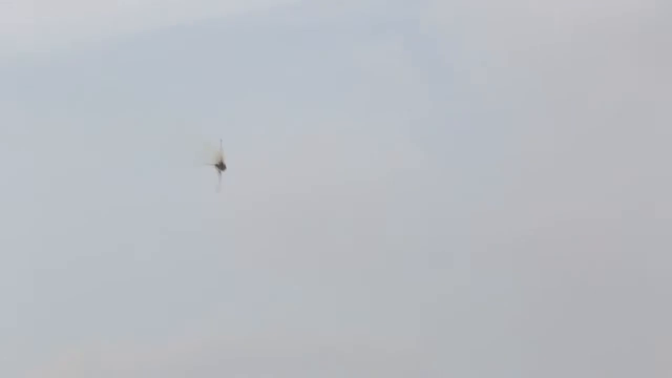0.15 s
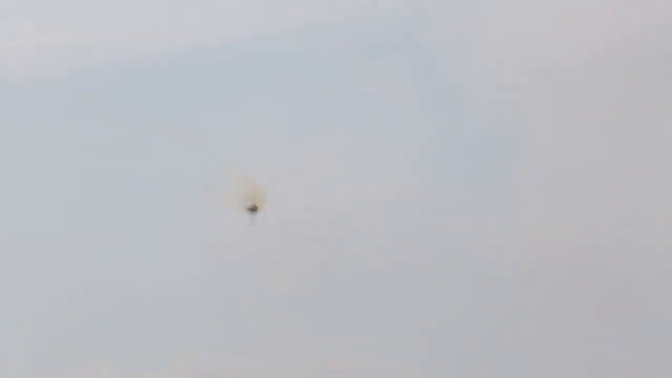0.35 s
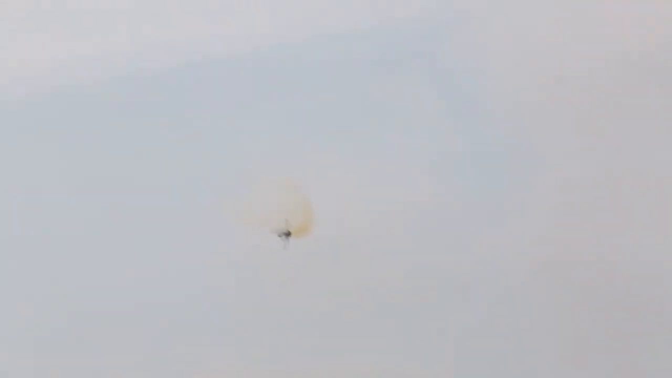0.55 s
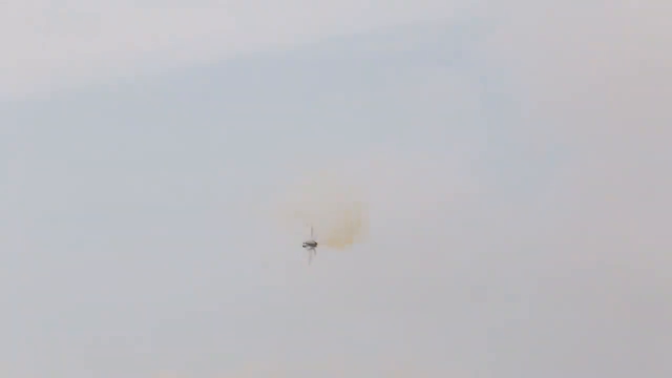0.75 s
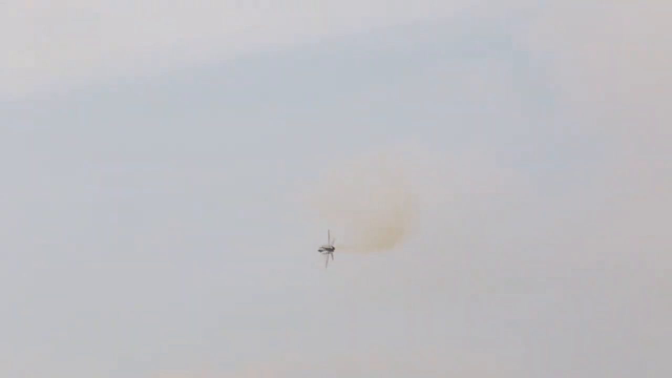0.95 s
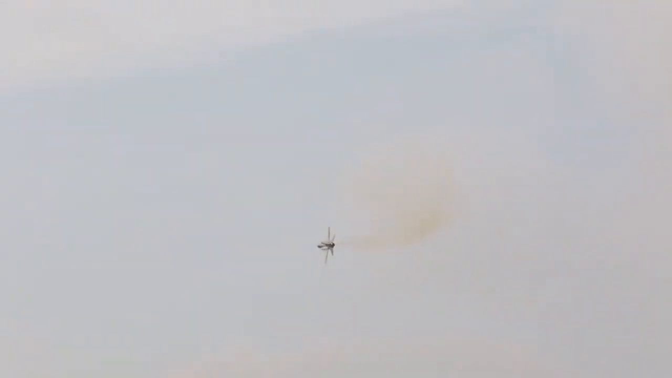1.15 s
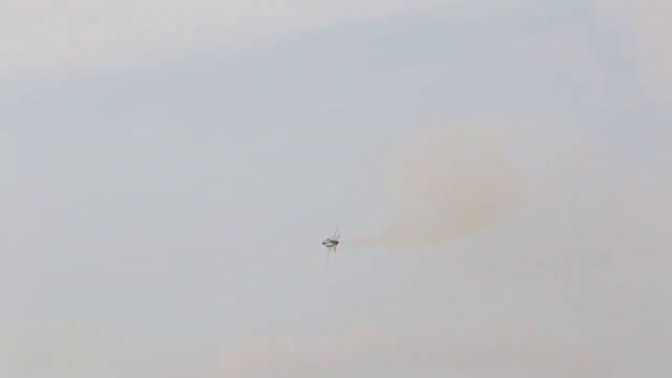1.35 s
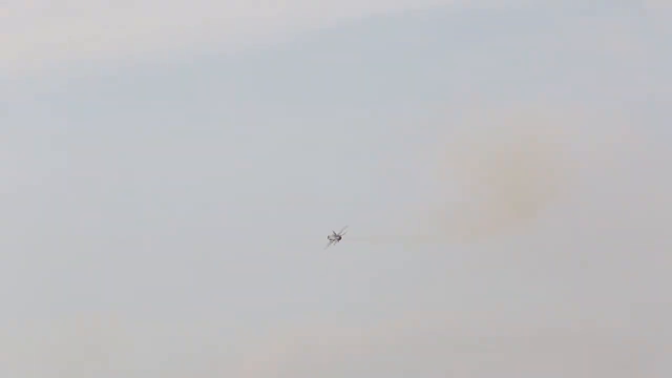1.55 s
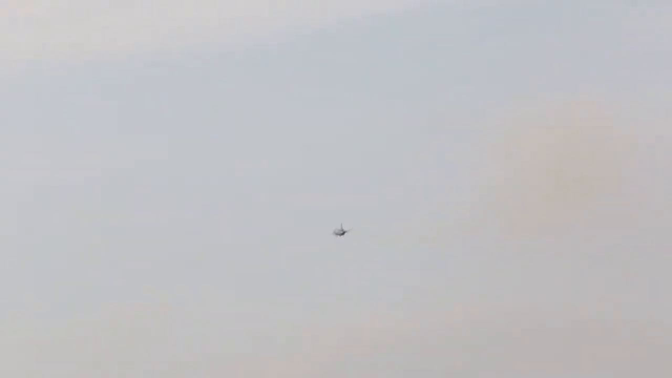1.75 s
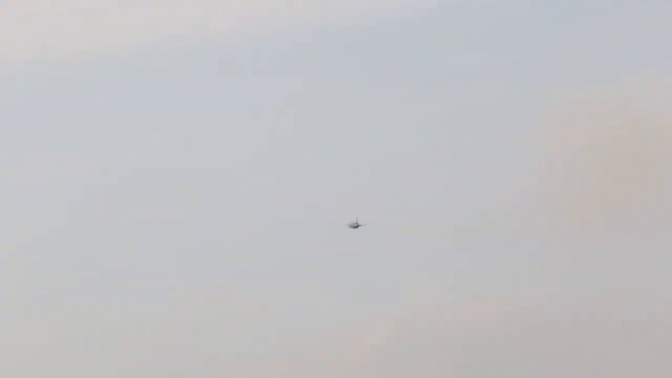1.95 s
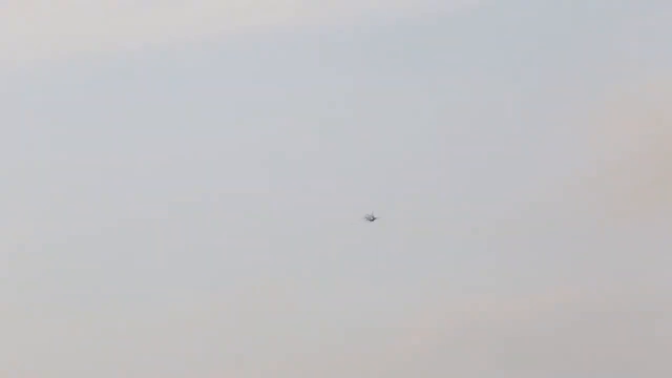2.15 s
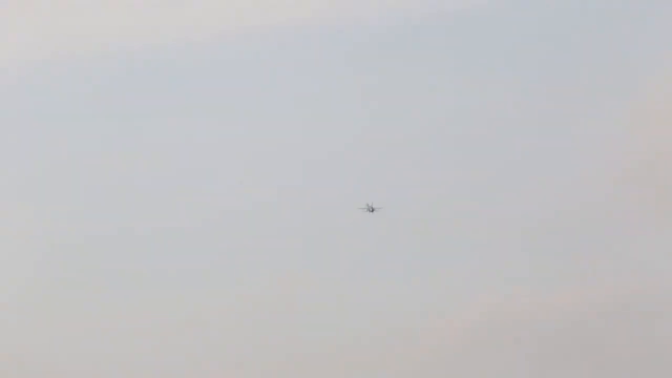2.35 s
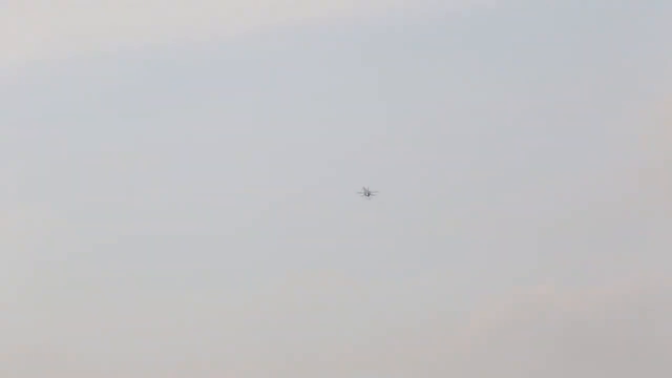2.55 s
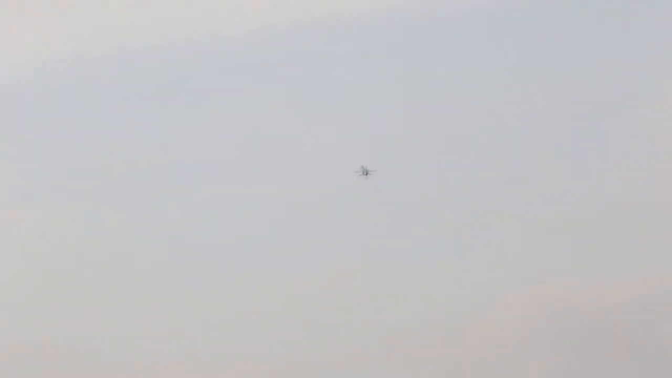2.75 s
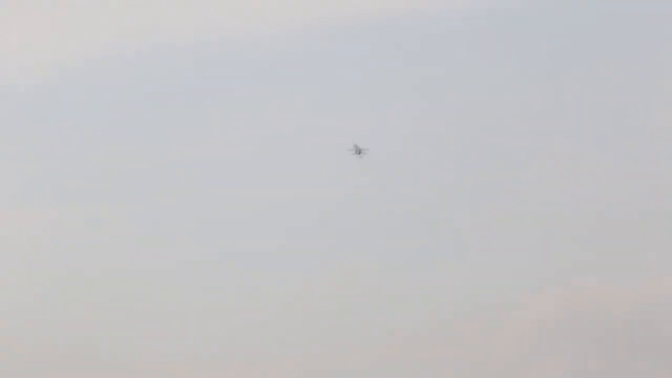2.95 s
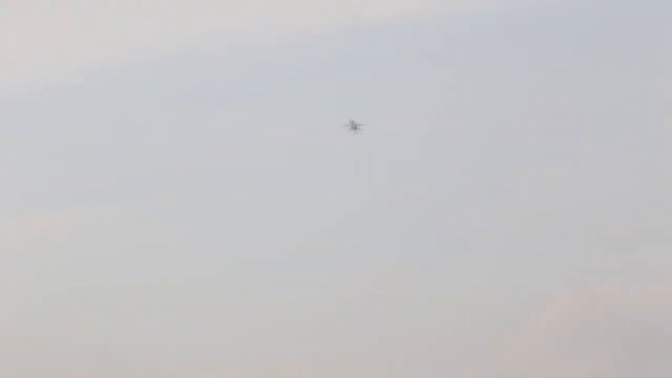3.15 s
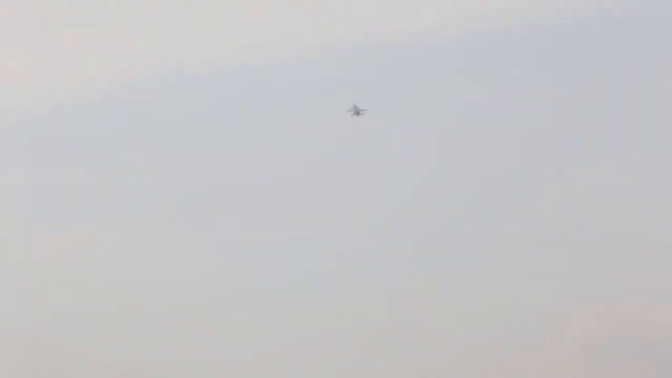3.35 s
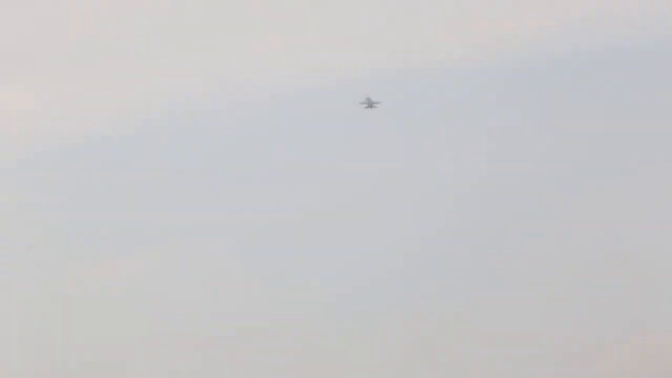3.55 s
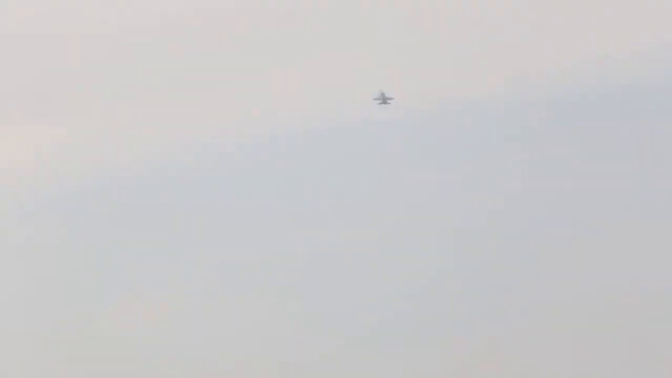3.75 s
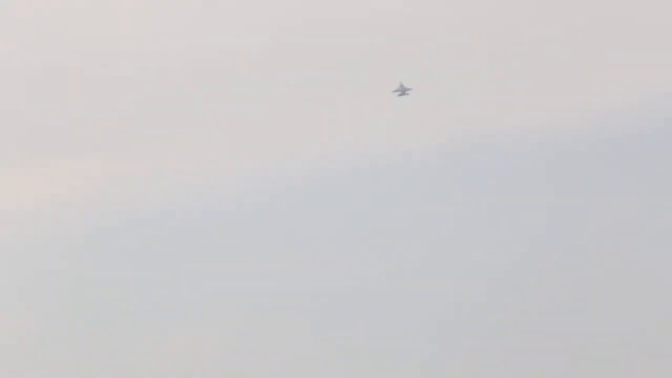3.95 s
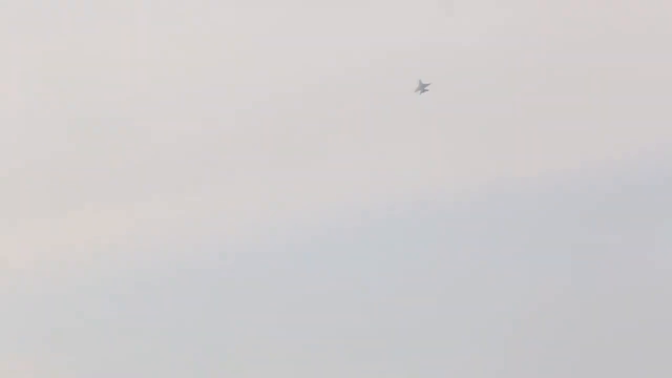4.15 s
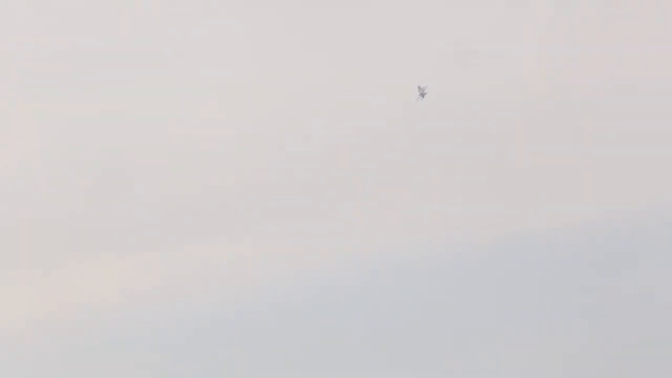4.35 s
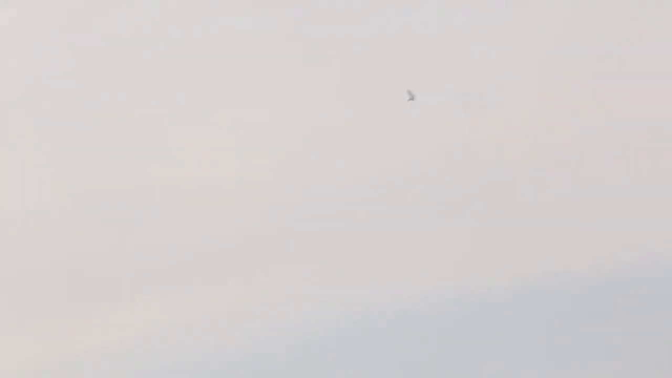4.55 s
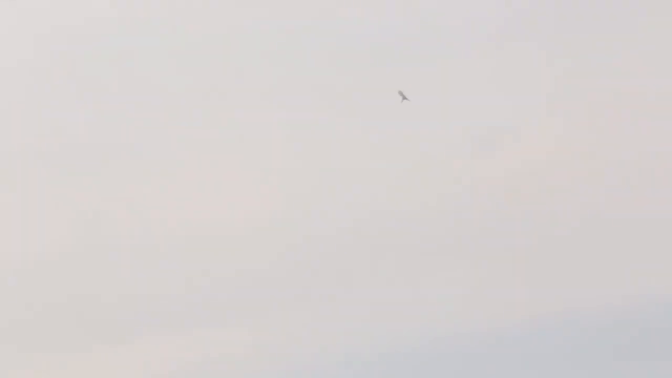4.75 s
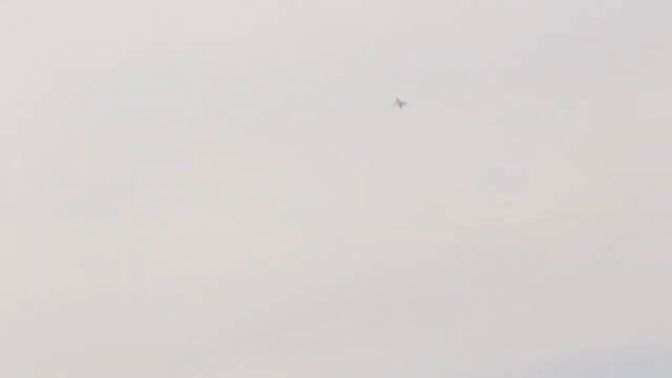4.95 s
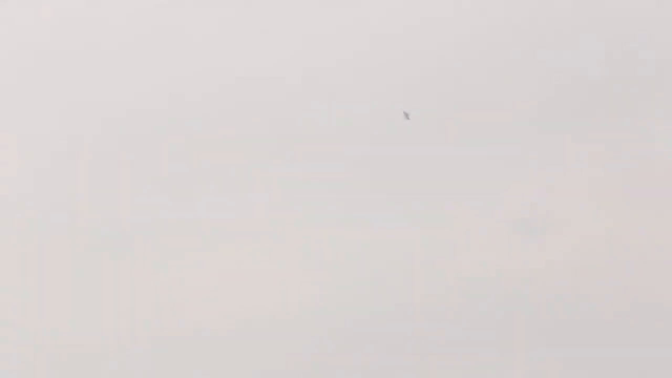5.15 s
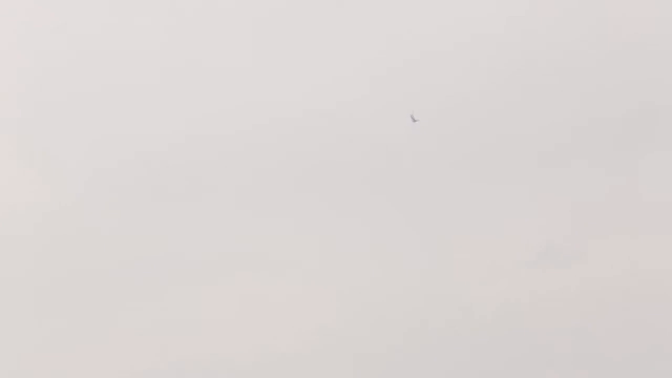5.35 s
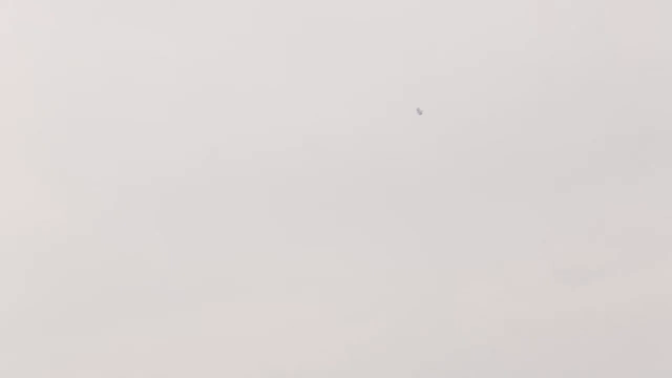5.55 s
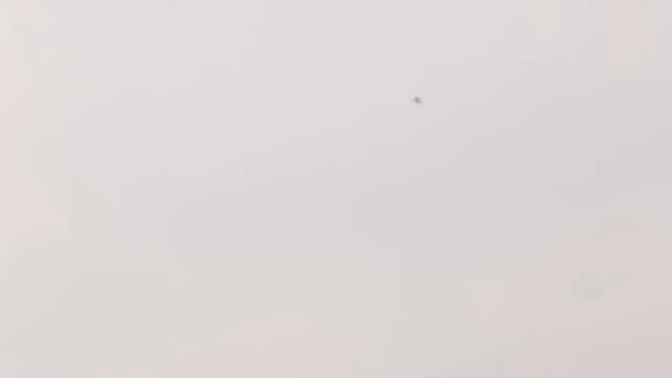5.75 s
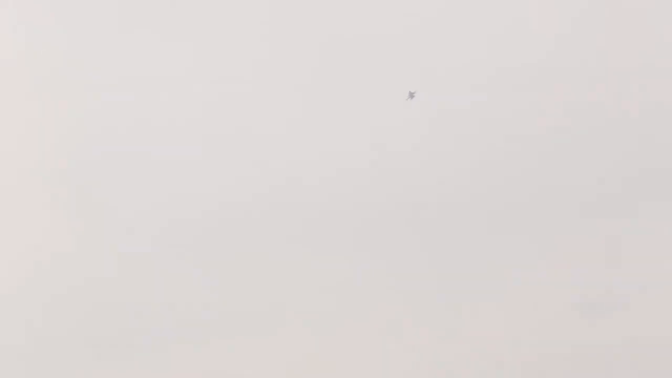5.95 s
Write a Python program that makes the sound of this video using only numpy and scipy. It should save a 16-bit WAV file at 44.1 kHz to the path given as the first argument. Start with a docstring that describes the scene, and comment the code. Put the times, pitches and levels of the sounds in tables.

```python
"""A harsh crackle overloads the microphone: a fighter jet has just passed low overhead and climbs away.
Its exhaust sends out a stream of small shocks (sudden jumps in air pressure), sharp when near and
rounded into a roar when far, while big swirls in the hot gas add a deep rumble. Around four seconds in,
the exhaust swings back towards the listener and the sound grows again. An echo off the ground cancels
some pitches and boosts others, giving the noise a sweeping tone."""
import sys
import numpy as np
from scipy import signal
from scipy.fft import rfft, irfft, next_fast_len
from scipy.io import wavfile
from scipy.ndimage import map_coordinates

SR = 44100
rng = np.random.default_rng(int(sys.argv[2]) if len(sys.argv) > 2 else 0)


def dump(signal):
    """Clip the signal to [-1, 1] and save it as 16-bit WAV at the path in sys.argv[1]."""
    limited = np.clip(np.atleast_2d(signal).T, -1, 1)
    pcm = np.round(limited * 32767).astype(np.int16)
    wavfile.write(sys.argv[1], SR, pcm)


N = 264600  # 6 seconds
TIME_S = np.arange(N) / SR


def from_db(db):
    """Turn decibels into a number to multiply by."""
    return 10 ** (np.asarray(db) / 20)


def values_at(rows, positions):
    """Look up positions in a table's first column and blend the nearest rows."""
    first, *columns = np.transpose(rows)
    return [np.interp(positions, first, column) for column in columns]


def shape_tone(sound, tone):
    """Filter by (pitch_hz, level_db) rows; white noise keeps its overall power."""
    size = 2 * next_fast_len(N)
    pitch_hz, level_db = np.transpose(tone)
    hz = np.maximum(np.arange(size // 2 + 1) * SR / size, 1)
    gain = from_db(np.interp(np.log(hz), np.log(pitch_hz), level_db)) * hz / np.hypot(hz, 20)
    gain /= np.sqrt(np.mean(gain ** 2))
    # minimum phase: the filter rings after a click, never before it
    cepstrum = irfft(np.log(gain))
    cepstrum[1:size // 2] *= 2
    cepstrum[size // 2 + 1:] = 0
    return irfft(rfft(sound, size) * np.exp(rfft(cepstrum)), size)[:N]


def noise(tone):
    """Steady noise with the given tone."""
    return shape_tone(rng.standard_normal(N), tone)


def swells(rows):
    """A loudness curve that rises and falls in one smooth bump per row."""
    return sum(from_db(level_db) * np.exp(-((TIME_S - peak_s) / half_length_s) ** 2)
               for peak_s, level_db, half_length_s in rows)


# Each swish: peak_s, level_db, half_length_s
SWISH_SWELLS = [(2.189, -80, 0.0094), (2.216, -70, 0.0047), (4.958, -81, 0.027), (4.972, -74, 0.0075)]
# Their tone: pitch_hz, level_db
SWISH_TONE = [(1000, -30), (3500, -6), (6500, 2), (9000, -13), (13000, -22)]

def swishes():
    """Faint, high puffs of noise near the microphone."""
    return swells(SWISH_SWELLS) * noise(SWISH_TONE)


# Each rush: peak_s, level_db, half_length_s
RUSH_SWELLS = [(1.02, -28, .04), (5.32, -36.5, 0.11), (5.88, -49.5, .12)]
# Their tone: pitch_hz, level_db
RUSH_TONE = [(400, -33), (750, -9), (1000, 0.5), (1350, 1.5), (1900, -11.5), (3000, -28), (6000, -63)]

def rushes():
    """The middle pitches of the roar swell briefly."""
    return swells(RUSH_SWELLS) * noise(RUSH_TONE)


def add_nearby_echoes(sound, level_db=-14, fade_60_db_s=.12, start_s=.003, above_hz=900):
    """Things around the microphone scatter sound into a short tail that fills the gaps between shocks."""
    t = np.arange(SR // 5) / SR
    tail = rng.standard_normal(len(t)) * from_db(-60 * t / fade_60_db_s) * (t > start_s)
    cut_bass = signal.butter(1, above_hz, "high", fs=SR, output="sos")
    tail = signal.sosfilt(cut_bass, tail / np.linalg.norm(tail))
    return sound + from_db(level_db) * signal.fftconvolve(sound, tail)[:N]


# The bounce off the ground: time_s, delay_ms, treble_share (0 to 1)
GROUND_BOUNCE = [(.1, 1.73, 0.52), (.75, 1.546, 0.47), (1.4, 1.396, 0.4), (1.6, 1.37, 0.08),
                 (2.8, 1.3, 0.15), (3.15, 1.24, 0.02), (3.45, 1.17, 0.45), (4.05, 1.163, 0.5),
                 (4.65, 1.1, 0.4), (5.35, 1.086, 0.52), (5.6, 1.02, 0.17)]

def add_ground_echo(sound, bass_share=.72, bass_below_hz=520):
    """The echo's delay shrinks as the jet recedes; rough ground mirrors bass better than treble."""
    delay_ms, treble_share = values_at(GROUND_BOUNCE, TIME_S)
    echo = map_coordinates(sound, [np.arange(N) - delay_ms * SR / 1000], order=3)
    bass = signal.sosfiltfilt(signal.butter(1, bass_below_hz, fs=SR, output="sos"), echo)
    return sound + bass_share * bass + treble_share * (echo - bass)


# The low sounds as the exhaust turns: time_s, rumble_db, rumble_pitch_ratio, boom_db
RUMBLE_CURVE = [(0, -13, 0.94, -29.5), (.3, -22, 0.87, -37), (.55, -19.5, 0.98, -53), (.9, -30, 0.81, -49),
                (1.25, -29.5, 0.76, -54.5), (1.7, -38, 0.77, -63.5), (2.35, -40.5, 0.93, -60),
                (3.1, -33.5, 1.33, -62.5), (3.65, -22, 1.163, -68.5), (4.1, -22.5, 1.125, -68),
                (4.8, -28.5, 1.01, -66), (5.3, -30.5, .93, -78), (5.8, -34.5, 0.86, -84.5),
                (6, -39, 0.77, -81.5)]
# Tone of the swirls at a pitch ratio of 1: pitch_hz, level_db
SWIRL_TONE = [(40.0, -38.5), (70.0, -19), (110.0, -9), (170.0, -1), (260.0, 1), (400.0, -5), (800.0, -17),
              (1600.0, -102.0)]
# Tone of the boom: pitch_hz, level_db
BOOM_TONE = [(20, -5), (45, -5.5), (80, 6), (160, -15), (500, -57)]

def rumble():
    """Big swirls of gas make a noise whose pitch follows the jet's heading, over a deep boom when near."""
    rumble_db, pitch_ratio, boom_db = values_at(RUMBLE_CURVE, TIME_S)
    # stepping through the noise faster raises its pitch
    swirls = map_coordinates(noise(SWIRL_TONE), [np.cumsum(pitch_ratio)], order=3, mode="mirror")
    return from_db(rumble_db) * swirls + from_db(boom_db) * noise(BOOM_TONE)


def shock_clicks(times_s, strength, rise_ms, size=129):
    """Draw the slope of each pressure jump: a tiny bump, narrower and sharper the faster the jump."""
    index = np.round(times_s * SR).astype(int)[:, None] + np.arange(size) - size // 2
    width_samples = np.maximum(rise_ms * SR / 1000, .3)[:, None]
    bump = 1 - np.tanh((index - times_s[:, None] * SR) / width_samples) ** 2
    bump *= (strength / bump.sum(axis=1))[:, None]
    inside = (index >= 0) & (index < N)
    return np.bincount(index[inside], bump[inside], N)


def bursts(times_s, changes_per_s=110):
    """A smooth random curve, high where the exhaust lets out a short burst of stronger shocks."""
    points = rng.standard_normal(int(N / SR * changes_per_s) + 2)
    return map_coordinates(points, [times_s * changes_per_s], order=3, mode="nearest")


# The shock stream, loud when the exhaust faces us, rounded by distance: time_s, level_db, typical_rise_ms
SHOCK_STREAM = [(0, 3, 0.014), (.15, 3, 0.021), (.36, 1, 0.027), (.47, -2.5, 0.049), (.51, -4, 0.088),
                (.66, -5.5, 0.058), (.8, -9, .072), (.94, -9, .076), (1.0, -6, 0.08), (1.17, -10, 0.097),
                (1.43, -9, 0.11), (1.54, -14.5, 0.12), (1.75, -15.5, 0.12), (2.25, -13.5, 0.13),
                (2.8, -13, 0.15), (3.5, -13, 0.14), (3.86, -11, 0.13), (3.9, -7, 0.13), (4.1, -8, 0.13),
                (4.3, -12, 0.14), (4.62, -11, 0.17), (4.72, -11, 0.16), (4.82, -14.5, 0.15),
                (5.1, -18.5, 0.14), (5.31, -15, .17), (5.42, -17, 0.19), (5.49, -20.5, 0.17),
                (5.74, -22, 0.18), (5.87, -18, .178)]
# Strong shocks catch up and merge into fewer, bigger ones: stream_level_db, shocks_per_s
SHOCK_RATE = [(-14, 1900), (-9, 1200), (-5, 750), (0, 650), (4, 850)]

def crackle(size_spread_db=3.3):
    """Shocks of random size come at uneven gaps; big ones, and those in bursts, stay sharper."""
    level_db, _ = values_at(SHOCK_STREAM, TIME_S)
    shocks_per_s, = values_at(SHOCK_RATE, level_db)
    top_rate = np.max(SHOCK_RATE, axis=0)[1]
    # a shock fires each time a running count passes the next random mark
    count = np.cumsum(shocks_per_s) / SR
    marks = np.cumsum(rng.gamma(2, .5, int(N / SR * top_rate)))
    reached = marks < count[-1]
    times_s = np.interp(marks[reached], count, TIME_S)
    size, luck = rng.standard_normal((len(marks), 2))[reached].T
    size = np.minimum(size, 1.4)
    burst = bursts(times_s)
    stream_db, rise_ms = values_at(SHOCK_STREAM, times_s)
    ragged_db = np.clip(2.9 + .175 * stream_db, .4, 2.9)  # a louder stream is more uneven
    sharpness = np.minimum(.6 * burst + .5 * size + .55 * luck, 1.5)
    strength_db = stream_db + size_spread_db * size + .25 * ragged_db * burst
    merge_gain = np.sqrt(top_rate / np.interp(times_s, TIME_S, shocks_per_s))  # fewer shocks, same power
    return shock_clicks(times_s, merge_gain * from_db(strength_db), rise_ms * from_db(-ragged_db * sharpness))


# Shocks that stand out: time_s, strength_db
BIG_SHOCKS = [(0.0324, 16), (0.0723, 15), (0.1116, 17), (0.1458, 24), (0.1747, 14), (0.2053, 16),
              (0.2614, 13.5), (0.3008, 13.5), (0.3277, 14), (0.3443, 18.5), (0.3717, 12), (0.3862, 6),
              (0.4091, 2.5), (0.4268, 6.5), (0.4482, 11), (0.4688, 10.5), (0.4811, 6.5), (0.5191, 7.5),
              (0.5407, 10), (0.5538, 6.5), (0.6341, 5), (0.6407, 11), (0.6659, 3), (0.7228, 0),
              (0.7618, 1.5), (0.8058, 2), (0.894, -0.5), (0.9984, 4.5), (1.0976, 0), (3.5574, -3),
              (3.5966, -4.5), (3.6218, -1), (3.6994, -5), (3.7351, -5), (3.7637, 0), (3.8242, 1.5),
              (3.8926, 4), (3.8995, 7), (3.9283, 6.5), (3.9428, -1.5), (3.9694, 4.5), (3.9881, 4),
              (4.002, 4.5), (4.0159, 6), (4.0507, 8), (4.0621, 2), (4.0726, 4), (4.0956, 2.5),
              (4.1431, 3.5), (4.1537, 0.5), (4.1663, -1), (4.1978, 1.5), (4.235, -3), (4.3559, 2.5),
              (4.3669, -0.5), (4.4021, -0.5), (4.499, -4), (4.5073, -5.5), (4.6515, -1), (4.67, -1.5),
              (4.6877, -3.5), (4.7081, -3.5), (4.7165, 4), (4.8647, -5.5), (4.9054, -9.5)]

def cracks(small_count=3, small_db=-13, spread_db=3, spread_s=.007):
    """Big shocks snap, sharper the more they top the stream, each among a few smaller ones."""
    times_s, strength_db = np.transpose(BIG_SHOCKS)
    stream_db, typical_rise_ms = values_at(SHOCK_STREAM, times_s)
    rise_ms = .74 * typical_rise_ms * from_db(-.2 * (strength_db - stream_db))
    snaps = shock_clicks(times_s, from_db(strength_db), rise_ms)
    for offset, size in rng.standard_normal((len(times_s), 2, small_count)).T:
        level_db = strength_db + small_db + spread_db * size
        snaps += shock_clicks(times_s + spread_s * offset, from_db(level_db), rise_ms)
    return snaps


# Tone of a perfectly sharp shock: pitch_hz, level_db
SHOCK_TONE = [(40, -32), (120, -20), (300, -8), (450, -1.5), (660, 0), (1000, -4.3), (1800, -7.6),
              (3000, -13.8), (6000, -24.7), (15000, -40)]

def exhaust_shocks():
    """All the shocks with their nearby echoes; a rise in pressure swings the microphone negative."""
    return -shape_tone(add_nearby_echoes(crackle() + cracks()), SHOCK_TONE)


def scene():
    """The jet is heard directly and off the ground, the swishes only directly; one channel."""
    jet = exhaust_shocks() + rumble() + rushes()
    return (add_ground_echo(jet) + swishes())[None]


def record(dry, hiss_db=-85.5, overload_level=.93, cutoff_hz=15400):
    """The microphone adds faint hiss, flattens the loudest peaks and loses the highest treble."""
    hiss = from_db(hiss_db) * rng.standard_normal(dry.shape)
    clipped = np.clip(dry + hiss, -overload_level, overload_level)
    return signal.sosfilt(signal.ellip(10, .1, 70, cutoff_hz, fs=SR, output="sos"), clipped)


dry = scene()
out = record(dry)
dump(out)
```